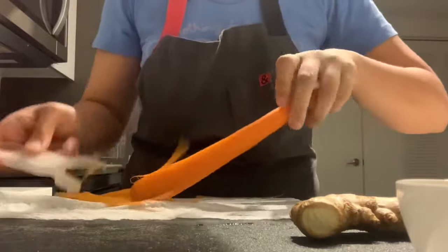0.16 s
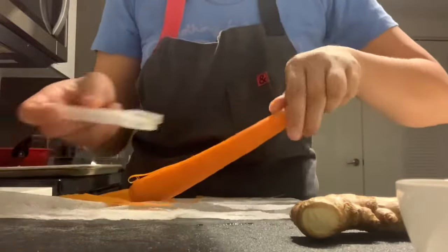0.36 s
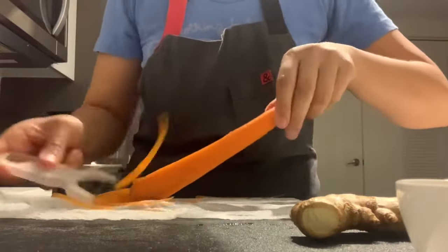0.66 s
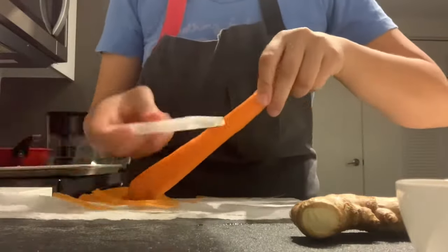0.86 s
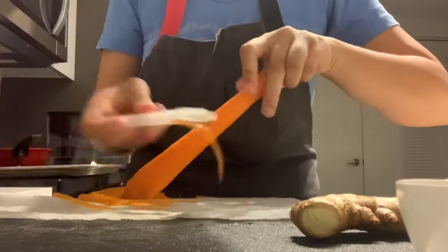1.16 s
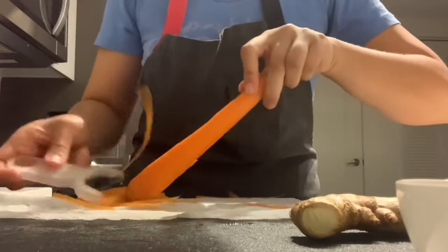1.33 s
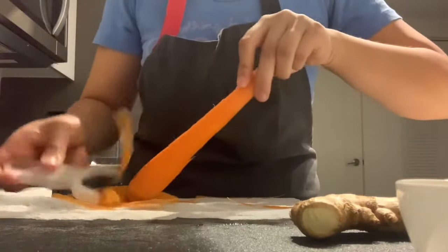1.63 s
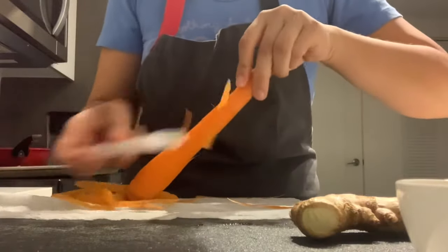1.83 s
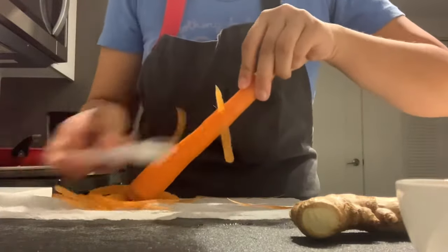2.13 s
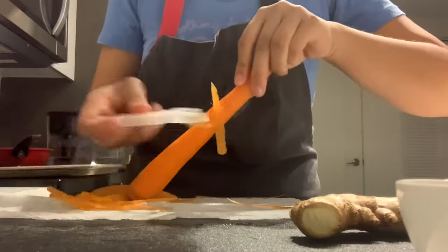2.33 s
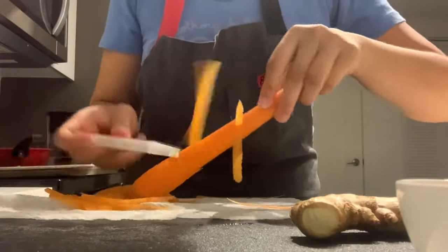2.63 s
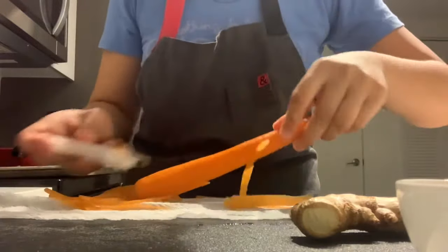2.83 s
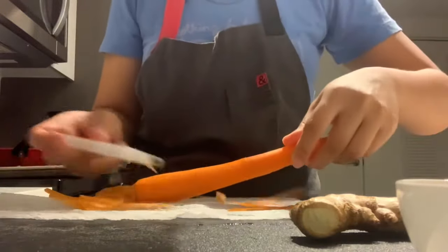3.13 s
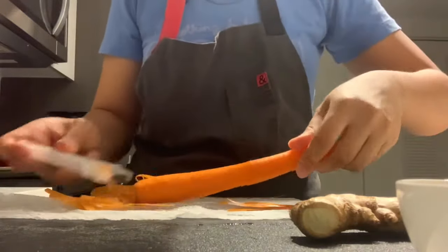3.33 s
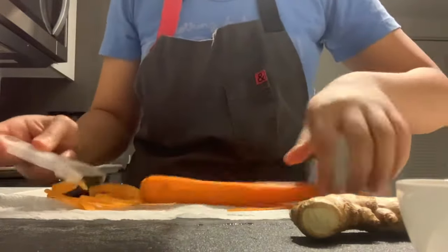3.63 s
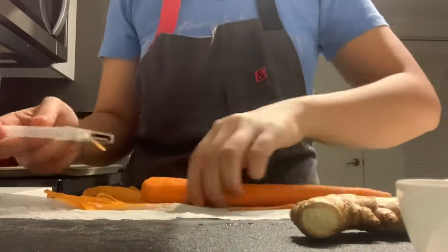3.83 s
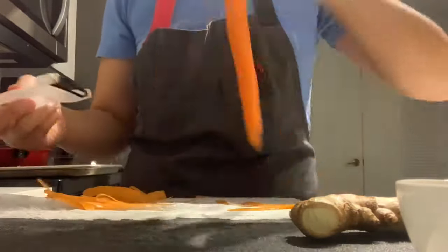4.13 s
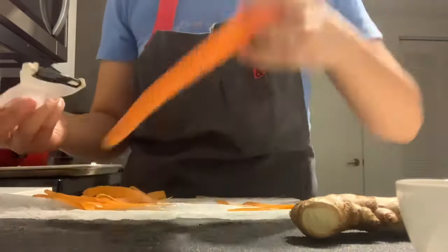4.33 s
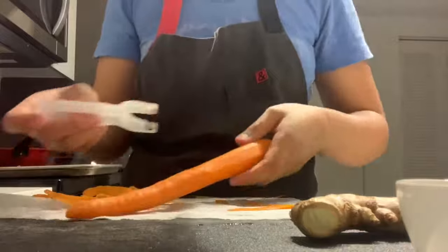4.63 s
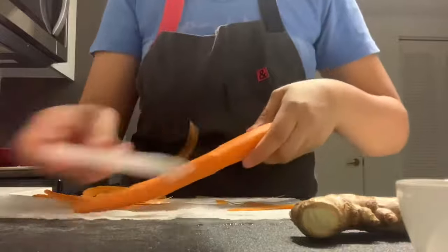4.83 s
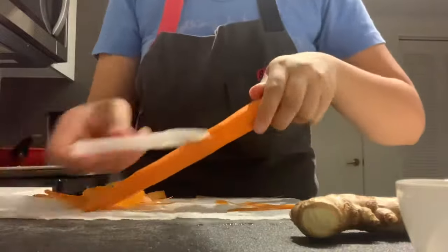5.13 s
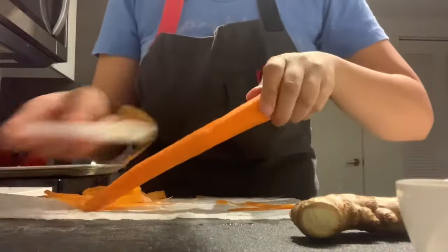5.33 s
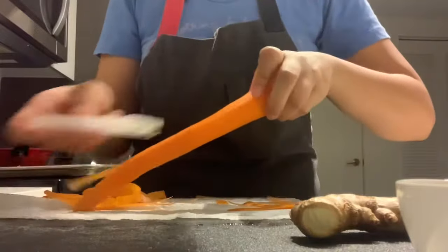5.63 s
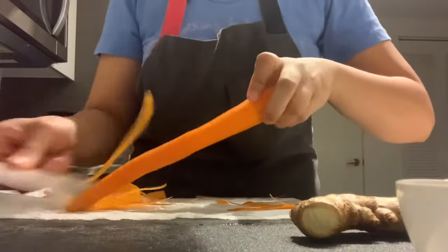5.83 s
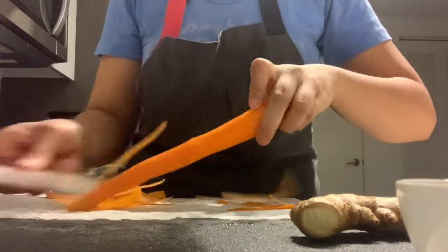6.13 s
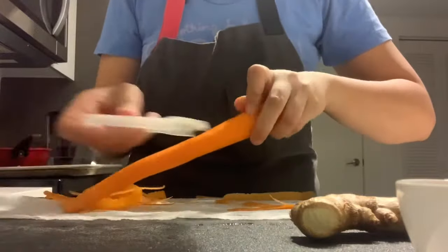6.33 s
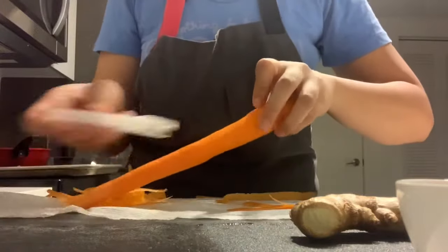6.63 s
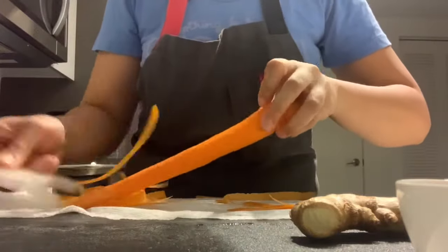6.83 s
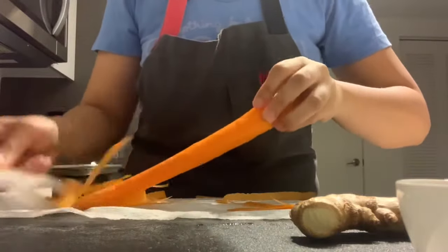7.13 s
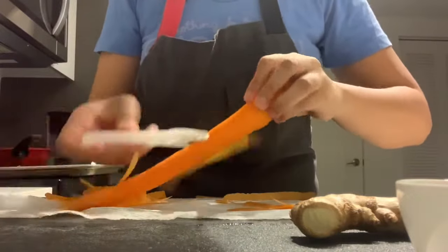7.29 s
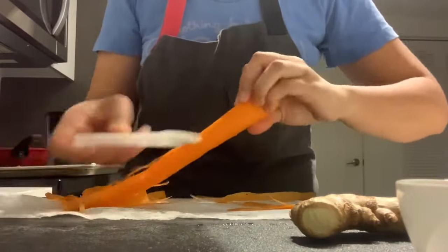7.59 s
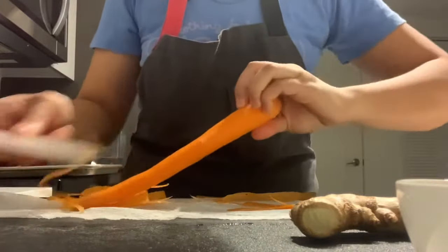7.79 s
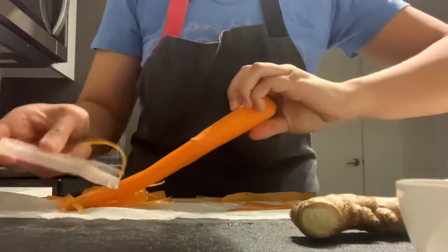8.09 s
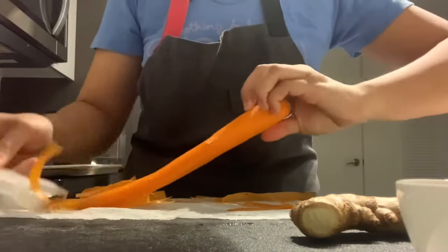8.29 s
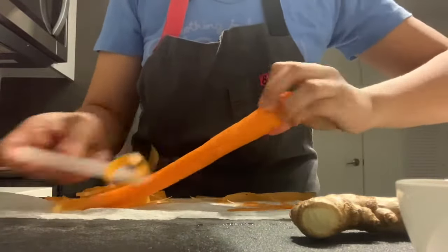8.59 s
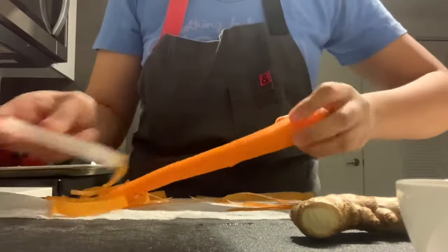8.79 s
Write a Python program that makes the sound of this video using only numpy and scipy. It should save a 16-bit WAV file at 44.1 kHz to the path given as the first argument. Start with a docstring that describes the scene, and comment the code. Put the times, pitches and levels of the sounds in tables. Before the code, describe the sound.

A hand peeler scrapes a carrot in quick crisp strokes, pauses for soft counter thuds, resumes, then clacks once, over a low hum.

```python
"""A swivel peeler takes quick strokes down a carrot, heard close over a paper-covered kitchen counter.
The blade clicks as it lands, rasps and sizzles as filtered bursting cells, and snaps as the strip comes free.
Midway the carrot is dropped and turned, thudding as struck modes; later the frame clacks on the counter.
Paper and cloth rustle as shaped noise, and an appliance hums as wavering sines over a rush of air.
A close microphone pair takes it in as a sum and a difference, with the kitchen's echoes behind."""
import sys
import numpy as np
from scipy import signal
from scipy.fft import rfft, irfft, next_fast_len
from scipy.io import wavfile

SR = 44100
rng = np.random.default_rng(int(sys.argv[2]) if len(sys.argv) > 2 else 0)


def master_out(mix):
    """Clip the mix to full scale and print it as 16-bit PCM to the path in sys.argv[1]."""
    frames = np.transpose(np.atleast_2d(mix))
    ceiling = np.clip(frames, -1, 1)
    pcm = np.round(ceiling * 32767).astype(np.int16)
    wavfile.write(sys.argv[1], SR, pcm)


N = 394694
TIME = np.arange(N) / SR


def from_db(db):
    """Decibels to amplitude gain."""
    return 10 ** (np.asarray(db) / 20)


def rms_one(x):
    """Scale to rms 1."""
    return x / np.sqrt(np.mean(x ** 2) + 1e-20)


def at_hz(points, hz):
    """Read the level of a table's first two columns on a log-frequency axis."""
    table = np.array(points)
    return np.interp(np.log(hz + 1e-3), np.log(table[:, 0]), table[:, 1])


def colour(x, spectrum, resonances=()):
    """Causal (minimum-phase) filter with a given spectrum and resonance peaks."""
    size = 2 * next_fast_len(x.shape[-1] // 2 + 1024)
    hz = np.arange(size // 2 + 1) * SR / size
    peaks_db = sum(boost / (1 + (2 * (hz - f) / width) ** 2) for f, width, boost in resonances)
    db = at_hz(spectrum, hz) + peaks_db
    # folding the cepstrum onto positive time gives the minimum phase
    cepstrum = irfft(np.log(from_db(db)))
    cepstrum[1:size // 2] *= 2
    cepstrum[size // 2 + 1:] = 0
    response = np.exp(rfft(cepstrum))
    return irfft(rfft(x, size) * response)[..., :x.shape[-1]]


def drift(rate_hz, size):
    """Random wander of rms 1: noise at half amplitude by rate_hz and falling above."""
    hz = np.arange(size // 2 + 1) * SR / size
    lowpass = 1 / (1 + (hz / rate_hz) ** 2)
    return rms_one(irfft(rfft(rng.standard_normal(size)) * lowpass, size))


def noise(size):
    """Unrelated white noise for the sum and the difference channel."""
    return rng.standard_normal((2, size))


def dying(t, t60):
    """Exponential decay from t = 0, silent before."""
    return from_db(-60 * np.maximum(t, 0) / t60) * (t >= 0)


def ring(t, hz, t60):
    """A struck mode, reaching the two channels in unrelated phases."""
    return np.sin(2 * np.pi * (hz * t + rng.random((2, 1)))) * dying(t, t60)


def add(out, s, x):
    """Mix x in at time s, trimming whatever falls outside."""
    at = round(s * SR)
    x = x[:, max(-at, 0):]
    part = out[:, max(at, 0):max(at, 0) + x.shape[-1]]
    part += x[:, :part.shape[-1]]


def ruptures(size, per_s, spread_db):
    """Cells bursting at the edge: dense clicks of uneven size."""
    born = rng.random(size) < per_s / SR
    unevenness = np.minimum(rng.exponential(1, size), 4)
    return noise(size) * born * from_db(spread_db * unevenness)


def wandering(x, patch_db, patch_hz):
    """The contact point moves, so each third of an octave swells and fades on its own."""
    size = x.shape[-1]
    hz = np.arange(size // 2 + 1) * SR / size
    place = 3 * np.log2(np.maximum(hz, 400) / 400)  # thirds of an octave above 400 Hz
    spectrum, out = rfft(x), 0
    for k in range(19):
        band = irfft(spectrum * np.maximum(1 - abs(place - k), 0), size)
        out = out + band * from_db(patch_db * drift(patch_hz, size))
    return rms_one(out) * np.sqrt(np.mean(x ** 2))


def narrow_noise(t, hz, width_hz):
    """A resonance shaken at random, along a steady or moving pitch."""
    phase = 2 * np.pi * np.cumsum(hz + 0 * t) / SR
    channels = []
    for _ in range(2):
        in_phase = drift(width_hz, len(t)) * np.cos(phase)
        quadrature = drift(width_hz, len(t)) * np.sin(phase)
        channels.append(in_phase + quadrature)
    return rms_one(np.array(channels))


# strokes down the carrot, levels relative: [landing t/s, strip free t/s, landing level/dB, landing ring f/Hz,
# rasp level/dB, place of greatest force 0-1, strip ring f/Hz, snap level/dB]
PEELING_STROKES = [(-0.09, 0.019, -25.5, 3900, -41, 0.94, 3930, -30.5),
                   (0.4516, 0.574, -23, 3900, -40.5, 0.74, 3500, -36),
                   (0.7962, 0.9237, -20.5, 6200, -42, 0.8, 3530, -30),
                   (1.1169, 1.2532, -17.5, 4140, -40.5, 0.72, 3450, -29),
                   (1.46, 1.554, -44, 4000, -41, .55, 3460, -43),
                   (1.714, 1.846, -22.5, 3000, -41, 0.63, 3540, -46.5),
                   (2.0008, 2.127, -23, 2940, -41, 0.83, 3620, -41),
                   (2.283, 2.403, -20.5, 2740, -40, 0.72, 3230, -30),
                   (2.5775, 2.665, -23.5, 5940, -42.5, .75, 2760, -26),
                   (2.8415, 2.927, -22.5, 4500, -43, 0.77, 2510, -29.5),
                   (3.1057, 3.188, -23.5, 3500, -41, 1, 2470, -37.5),
                   (4.717, 4.848, -20, 3726, -39.5, .53, 3570, -32.5),
                   (5.046, 5.172, -18, 3830, -40, 0.62, 2530, -35),
                   (5.345, 5.46, -20.5, 7040, -40, 0.47, 2440, -31.5),
                   (5.6477, 5.783, -23, 3130, -38.5, 0.63, 3350, -46),
                   (5.9651, 6.102, -24.5, 7040, -41, 0.67, 3360, -43.5),
                   (6.3033, 6.426, -22, 6140, -38.5, 0.84, 3700, -25.5),
                   (6.634, 6.763, -17.5, 7060, -38, 0.63, 2470, -48),
                   (6.9334, 7.052, -20, 6670, -40, 0.74, 3450, -46),
                   (7.232, 7.37, -20.5, 6600, -38.5, 0.69, 3290, -41),
                   (7.5073, 7.657, -24, 3470, -42, 1, 3460, -18),
                   (7.857, 7.973, -27.5, 3030, -40, 0.86, 2470, -46),
                   (8.487, 8.6, -30, 3600, -44, 0.59, 3540, -43),
                   (8.892, 9.009, -23.5, 6620, -44.5, 0.8, 2560, -46)]
# low crunch of the flesh, spectral shape: [f/Hz, level/dB]
CRUNCH_SPECTRUM = [(200, -37), (400, 2.5), (550, 0), (780, 2.5), (1050, -1.5), (1500, -2.5), (1900, 3),
                   (2600, -24)]
# rasp of the edge through the flesh, spectral shape: [f/Hz, level/dB]
RASP_SPECTRUM = [(1200, -21), (2000, -7.5), (2500, 2), (3400, 1.5), (4300, 0.5), (5100, -3), (6400, -2),
                 (7500, -5), (9500, -12), (12000, -38)]
# sizzle of the juice, spectral shape: [f/Hz, level/dB]
SIZZLE_SPECTRUM = [(7000, -25.5), (10000, -3), (11500, 2), (13300, 5.5), (14500, 3), (15600, -12),
                   (17000, -48.5)]
# rumble of the hand's push in the counter, spectral shape: [f/Hz, level/dB]
PUSH_SPECTRUM = [(60, -23), (110, -20), (170, 12), (220, -1), (320, -11), (600, -31.5), (1500, -50.5)]
# resonances of blade and handle: [f/Hz, width f/Hz, nominal boost level/dB]
BLADE_RESONANCES = [(1386, 67, 6), (1628, 61, 6.5), (2095, 64, 6.5), (2440, 160, 5), (3050, 19, 5.5),
                    (3520, 150, 2.5), (3930, 79, 2.5), (4940, 110, 0), (6700, 86, -4.5)]
# how hard the hand bears on the counter through the carrot, less once it rests on its tip: [t/s, level/dB]
HAND_BEARING = [(0, -54), (.45, -60), (1.1, -49), (1.7, -46), (2.4, -51.5), (3.1, -48.5), (4.7, -61),
                (8.5, -60)]
# the force builds from the landing to its crest, then eases as the carrot runs out
BUILD_DB, EASE_DB_PER_STROKE = 14, 17
# the sizzle takes only a share of a stroke's strength
USUAL_RASP_DB, SIZZLE_FOLLOWS = -38.5, .65


def strokes(bite_s=0.014, release_t60=0.072, catch_db=0.3, rasp_db=-2.0, crunch_db=-9.0, sizzle_db=-8.0,
            sizzle_arc=0.77, ring_fall=0.5):
    """The blade cuts down the carrot, catching and slipping; the hand's push rumbles in the counter."""
    out, t = np.zeros((2, N)), np.arange(SR // 4) / SR
    for start, end, _, _, db, crest, hz, _ in PEELING_STROKES:
        length = max(end - start, .01)
        along = np.minimum(t / length, 1)
        contact = np.minimum(t / bite_s, 1) * from_db(-60 * np.maximum(t - length, 0) / release_t60)
        build_db = BUILD_DB * np.maximum(1 - along / crest, 0)
        ease_db = EASE_DB_PER_STROKE * np.maximum(along - crest, 0)
        arc_db = -build_db - ease_db
        force = from_db(db + arc_db)
        cells = [ruptures(len(t), per_s=12000, spread_db=2.0) for _ in range(3)]
        cut = from_db(rasp_db) * rms_one(colour(cells[0], RASP_SPECTRUM, BLADE_RESONANCES))
        cut += from_db(crunch_db) * rms_one(colour(cells[1], CRUNCH_SPECTRUM, BLADE_RESONANCES))
        cut = wandering(cut, patch_db=4.2, patch_hz=28)
        # the free strip of peel rings lower as it grows longer
        strip_hz = hz * 2 ** (ring_fall * (.5 - along))
        strip = narrow_noise(t, strip_hz, width_hz=61)
        cut += from_db(-7) * np.sin(np.pi * along) * strip
        # the juice sizzles more evenly than the flesh rasps
        wet_db = USUAL_RASP_DB + SIZZLE_FOLLOWS * (db - USUAL_RASP_DB) + sizzle_arc * arc_db + sizzle_db
        wet = from_db(wet_db) * rms_one(colour(cells[2], SIZZLE_SPECTRUM))
        catching = from_db(catch_db * drift(150, len(t)))
        bearing_db = np.interp(start, *np.transpose(HAND_BEARING))
        rumble = from_db(bearing_db) * rms_one(colour(noise(len(t)), PUSH_SPECTRUM))
        add(out, start, contact * (catching * (force * cut + wet) + rumble))
    return out


# the free blade swinging against its stops, and at 2.57 s a duller first touch just before a landing,
# levels relative: [t/s, level/dB, ring f/Hz]
LIGHT_TICKS = [(0.338, -44.5, 7500), (1.0028, -38.5, 4230), (1.3382, -39, 3760), (1.3516, -37, 3760),
               (1.4246, -28, 3970), (1.623, -36, 4180), (2.5703, -19, 5430), (3.3597, -38, 3890),
               (3.4162, -30.5, 2420), (3.96, -46, 7780), (5.26, -39, 4070), (5.875, -34, 2130),
               (7.075, -39.5, 2410), (7.395, -37, 2640), (8.105, -35, 2370)]
# colour of the clicks: (treble level/dB, low level/dB, both re the middle range, boost of the ring level/dB)
LANDING_TONE, SNAP_TONE, TICK_TONE = (0.0, -9.5, 8.0), (3.0, -10, 8.0), (-11.5, -8.0, 13.0)
# below a firm blow the clicks lose treble, landings faster than snaps
FIRM_DB, LANDING_DULLS_DB_PER_DB, SNAP_DULLS_DB_PER_DB = -22.5, 1.9, 0.37


def blade_hits(snap_hz=2500):
    """List landings, snaps and ticks as (t/s, level/dB, ring f/Hz, tone, lost treble level/dB)."""
    hits = [(s, db, hz, TICK_TONE, 0) for s, db, hz in LIGHT_TICKS]
    for start, end, landing_db, hz, _, _, _, snap_db in PEELING_STROKES:
        landing_loss_db = LANDING_DULLS_DB_PER_DB * max(FIRM_DB - landing_db, 0)
        snap_loss_db = SNAP_DULLS_DB_PER_DB * max(FIRM_DB - snap_db, 0)
        hits.append((start, landing_db, hz, LANDING_TONE, landing_loss_db))
        hits.append((end, snap_db, snap_hz, SNAP_TONE, snap_loss_db))
    return hits


# middle range of the blade's clicks, spectral shape: [f/Hz, level/dB]
CLICK_SPECTRUM = [(1200, -19), (2000, -11), (2700, 2.5), (3700, 1.5), (5100, -2.5), (6600, 4), (7800, 0),
                  (9500, 4.5), (12000, -17)]


def clicks(first_db=0.5, touch_s=.0004, contact_t60=.011, clatter_db=-24.0, tail_db=-5.5, tail_t60=0.093,
           treble_t60=.15, level_db=-10.0, ring_width_hz=490):
    """The blade hits one pivot, then the other, and clatters; the counter scatters the sound briefly."""
    out, t = np.zeros((2, N)), np.arange(SR // 12) / SR
    # struck, the blade's resonances stand out more than in the cut
    struck = [(f, width, boost * 1.3) for f, width, boost in BLADE_RESONANCES]
    for s, db, hz, (treble, low, boost), dulling in blade_hits():
        rebound, clatter = rng.uniform(.0014, .0026), rng.uniform(.004, .008)  # s after the first touch
        shape = from_db(first_db) * np.minimum(t / touch_s, 1) * dying(t, contact_t60 / 2)
        shape += dying(t - rebound, contact_t60)
        shape += from_db(clatter_db) * dying(t - clatter, contact_t60)
        shape += from_db(tail_db) * dying(t - rebound, tail_t60)
        # a light tick leaves the blade free to ring; a landing in the flesh damps it. The treble dies first
        parts = [(CLICK_SPECTRUM, 0, struck + [(hz, ring_width_hz, boost)], shape),
                 (CRUNCH_SPECTRUM, low, struck, shape),
                 (SIZZLE_SPECTRUM, treble - dulling, [], shape * dying(t, treble_t60))]
        click = 0
        for spectrum, gain_db, peaks, burst in parts:
            click = click + from_db(gain_db) * rms_one(colour(noise(len(t)) * burst, spectrum, peaks))
        add(out, s, from_db(db + level_db) * np.sqrt(np.mean(shape ** 2)) * click)
    return out


# mains hum, mean levels before the microphones: [f/Hz, level/dB]
MAINS_HUM = [(59.2, -59.5), (119.8, -52), (240.5, -63.5), (306, -76.5)]
# rush of air, spectral shape: [f/Hz, level/dB]
AIR_SPECTRUM = [(25, -35.5), (38, -12), (52, -3.5), (90, -5), (160, -13.5), (240, -16), (400, -22),
                (600, -32), (1000, -40), (2500, -47), (5000, -65.5), (14000, -63.5)]


def appliance(waver_db=2.0, waver_rad=.2, air_db=-52.0):
    """A motor hums on the mains over a low rush of air."""
    hum = 0
    for hz, db in MAINS_HUM:
        level = np.sqrt(2) * from_db(db + waver_db * drift(2.1, N))
        hum = hum + level * np.sin(2 * np.pi * hz * TIME + waver_rad * drift(1.0, N))
    air = from_db(air_db) * rms_one(colour(noise(N), AIR_SPECTRUM))
    return hum * np.array([[1], [0]]) + air  # the hum is in the sum channel only


# paper and peel shifting under the carrot, and at 8.3 s the clack's echo dying away in the kitchen:
# [loudest t/s, level/dB, swell over 20 dB t/s, settling over 20 dB t/s]
SOFT_SWELLS = [(2.56, -57.5, 0.11, .09), (3.43, -57.5, 0.22, .28), (3.72, -67, .2, .35),
               (4.56, -69, .5, .5), (7.49, -54.5, .08, 0.13), (8.01, -55, 0.3, 1), (8.3, -54, .2, 0.32)]
# rustle of paper, spectral shape: [f/Hz, level/dB]
PAPER_SPECTRUM = [(150, -15.5), (350, 3), (800, -1.5), (1600, -8.5), (3000, -4.5), (6000, -16.5),
                  (10000, -25.5), (14000, -20), (17000, -37.5)]
# smooth rubs of wet skin, peel, paper and cloth: [start t/s, length t/s, level/dB, centre f/Hz, width f/Hz]
SMOOTH_RUBS = [(2.45, 0.07, -54, 301, 69.3), (2.456, 0.14, -61.5, 2320, 500),
               (3.41, 0.18, -65.5, 13800, 399), (4.128, 0.25, -70.5, 1486, 130),
               (4.159, 0.44, -83, 3540, 903), (4.36, 0.073, -44, 172, 30), (7.968, 0.061, -56, 1288, 390),
               (7.975, 0.09, -54.5, 428.5, 110.4), (8.286, 0.073, -50, 342, 80)]


def rustle(handling_db=-73.0):
    """Soft noise swells and settles, as paper and peel shift and the clack's echo fades; skin and cloth rub."""
    level = from_db(handling_db)  # the faint rustle that never stops
    for s, db, swell, settling in SOFT_SWELLS:
        away = np.maximum((s - TIME) / swell, (TIME - s) / settling)
        level = np.maximum(level, from_db(db - 20 * away))
    uneven = noise(N) * from_db(2.0 * drift(30, N))
    out = level * rms_one(colour(uneven, PAPER_SPECTRUM))
    for s, length, db, hz, width in SMOOTH_RUBS:
        t = np.arange(int(max(length, .02) * SR)) / SR
        add(out, s, from_db(db) * signal.windows.tukey(len(t), .5) * narrow_noise(t, hz, width))
    return out


# the carrot and the hand meeting the counter, levels relative: [t/s, level/dB, pitch f/Hz, slap re thud level/dB]
COUNTER_KNOCKS = [(3.421, -30, 174, -16.5), (3.589, -20.5, 167, -4), (3.646, -19.5, 169, -26),
                  (3.692, -36.5, 200, -24.5), (3.769, -32, 178, -16.5), (4.350, -28, 181, -8),
                  (4.367, -35, 125.8, -19), (4.443, -45, 145, 2.5), (4.48, -40, 173, -14),
                  (4.523, -39.5, 134, -14.5), (8.188, -35, 186.4, -11)]
# modes of carrot and counter top: [multiple of the knock's pitch, level/dB, t60 t/s]
THUD_MODES = [(.62, -6, .07), (1.0, 4, 0.055), (1.25, -9, .07), (1.88, -8.5, .055), (2.45, -18.5, 0.065),
              (3.4, -17, 0.034)]
# damp slap on the paper, spectral shape: [f/Hz, level/dB]
SLAP_SPECTRUM = [(150, -7), (320, 1.5), (650, 0), (1000, -10.5), (1600, -8.5), (2500, -13.5), (5000, -35.5),
                 (14000, -49)]


def knocks(slap_t60=0.091, slap_db=-2.5, rise_s=0.008, thud_db=7.0):
    """A soft heavy contact swells into a thud of the counter top, with a damp slap on the paper."""
    out, t = np.zeros((2, N)), np.arange(SR // 4) / SR
    for s, db, hz, slap in COUNTER_KNOCKS:
        thud = 0
        for multiple, level, t60 in THUD_MODES:
            thud = thud + from_db(level) * np.sin(2 * np.pi * multiple * hz * t) * dying(t, t60)
        thud *= from_db(thud_db) * (1 - np.exp(-(t / rise_s) ** 2))
        skin = from_db(slap + slap_db) * rms_one(colour(noise(len(t)), SLAP_SPECTRUM)) * dying(t, slap_t60)
        add(out, s, from_db(db) * (thud * np.array([[1], [0]]) + skin))
    return out


# the peeler's frame striking the counter and rebounding, levels relative: [t/s, level/dB]
FRAME_BLOWS = [(8.1848, -8), (8.1865, -11), (8.1895, -25), (8.196, -30)]
# modes of the frame: [f/Hz, level/dB, t60 t/s]
FRAME_MODES = [(711, -21.5, 0.027), (1420, -18, 0.013), (3100, -11.5, 0.029), (3845, -3, 0.026),
               (4060, -7.5, 0.022), (4470, -10.5, .022), (4830, -17.5, 0.0096), (5760, -11, 0.0091),
               (8270, -12, 0.011), (13270, -7.5, .008)]
# hard crack of plastic on the counter, spectral shape: [f/Hz, level/dB]
CRACK_SPECTRUM = [(250, -23), (550, -10), (1400, -7.5), (2200, -5.5), (3000, -1), (5400, -2.5), (6500, -12),
                  (8500, -15.5), (13000, -6), (16000, -17)]


def clack(crack_db=-14.0, crack_t60=.012, scatter_db=-25.0, scatter_t60=.08):
    """The plastic frame hits the counter hard: its short ring, and a crack that spreads through the room."""
    ringing, cracking, t = np.zeros((2, N)), np.zeros((2, N)), np.arange(SR // 8) / SR
    for s, db in FRAME_BLOWS:
        blow = from_db(db) * np.minimum(t / 0.00054, 1)  # s of contact rise
        burst = from_db(crack_db) * dying(t, crack_t60) + from_db(scatter_db) * dying(t, scatter_t60)
        modes = sum(from_db(level) * ring(t, hz, t60) for hz, level, t60 in FRAME_MODES)
        add(ringing, s, blow * modes)
        add(cracking, s, blow * burst * rms_one(colour(noise(len(t)), CRACK_SPECTRUM)))
    return ringing, cracking


# the kitchen's decay: [f/Hz, t60 t/s]
KITCHEN_T60 = [(100, 0.3), (800, 0.71), (2500, 0.49), (5500, 0.42), (9000, 0.44), (15000, 0.066)]


def kitchen(x, gap_s=0.013):
    """Diffuse echoes of a small hard room, each band of about an octave dying at its own rate."""
    t, edges = np.arange(SR) / SR, np.geomspace(60, 17000, 9)
    tail = 0
    for low, high in zip(edges, edges[1:]):
        bandpass = signal.butter(2, [low, high], "band", fs=SR, output="sos")
        band = signal.sosfilt(bandpass, noise(len(t)))
        tail = tail + band * dying(t - gap_s, at_hz(KITCHEN_T60, np.sqrt(low * high)))
    # the sum channel feeds the echoes of both
    return signal.fftconvolve(x[:1], rms_one(tail) / np.sqrt(len(t)), axes=1)[:, :N]


# the microphone pair's response to the sum of its two ports: [f/Hz, level/dB]
SUM_RESPONSE = [(400, -0.5), (700, -0.5), (3000, -2), (6800, 0), (7900, -3.5), (9100, -28), (10400, -6),
                (12000, -1)]
# its response to their difference: [f/Hz, level/dB]
DIFFERENCE_RESPONSE = [(60, -9), (200, -18), (380, -2.5), (700, 2.5), (1300, -2.5), (3000, -5),
                       (4800, -2.5), (7000, 2), (9000, 4), (12000, -3.5), (14000, -29.5)]
# left over right: [f/Hz, level/dB]
LEFT_OVER_RIGHT = [(60, 5), (125, 5), (250, 1.5), (500, 0.5), (1500, -1), (4000, -0.3), (14000, -0.7)]


def scene(room_db=-15.5, crack_room_db=-10.0, frame_room_db=-27.0):
    """Everything reaches a closely spaced microphone pair as a sum and a difference."""
    near = strokes() + clicks() + rustle() + knocks()
    frame, crack = clack()
    into_room = from_db(room_db) * near + from_db(crack_room_db) * crack + from_db(frame_room_db) * frame
    total = near + frame + crack + kitchen(into_room) + appliance()
    mid = colour(total[0], SUM_RESPONSE)
    side = colour(total[1], DIFFERENCE_RESPONSE)
    left = colour(mid + side, [(hz, db / 2) for hz, db in LEFT_OVER_RIGHT])
    right = colour(mid - side, [(hz, -db / 2) for hz, db in LEFT_OVER_RIGHT])
    return np.array([left, right])


def record(dry, cutoff_hz=16400):
    """The top is cut steeply by an elliptic low-pass."""
    lowpass = signal.ellip(10, .2, 80, cutoff_hz, fs=SR, output="sos")
    return signal.sosfilt(lowpass, dry)


dry = scene()
out = record(dry)
master_out(out)
```